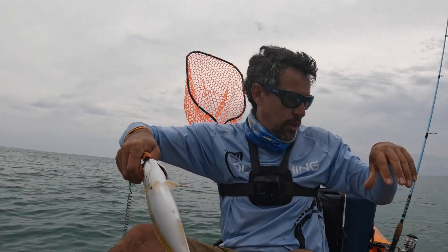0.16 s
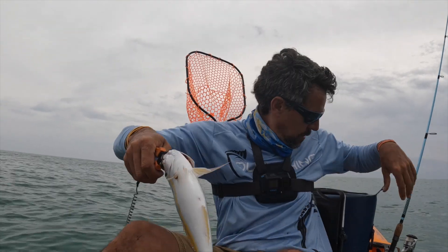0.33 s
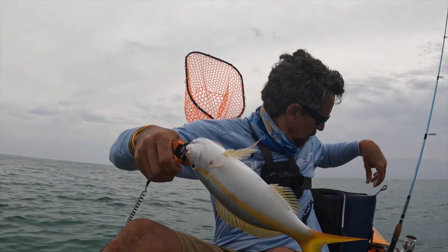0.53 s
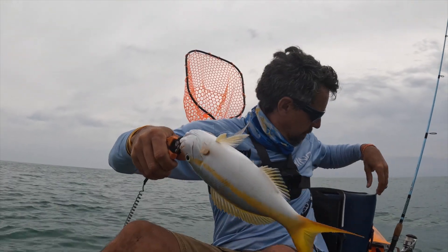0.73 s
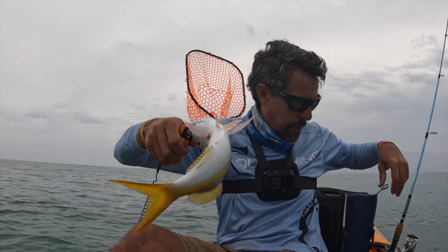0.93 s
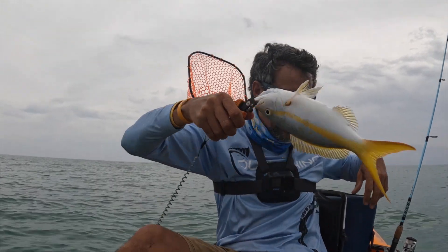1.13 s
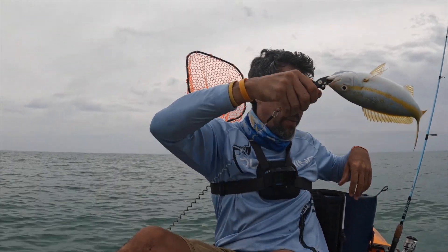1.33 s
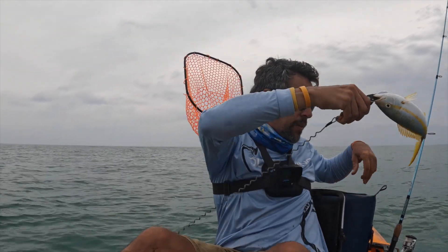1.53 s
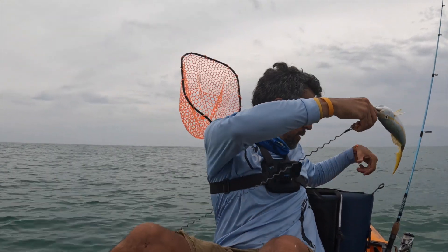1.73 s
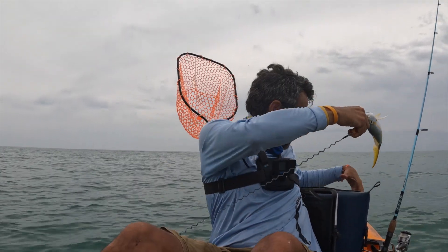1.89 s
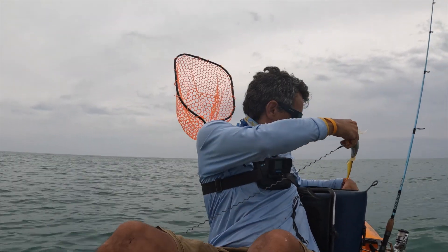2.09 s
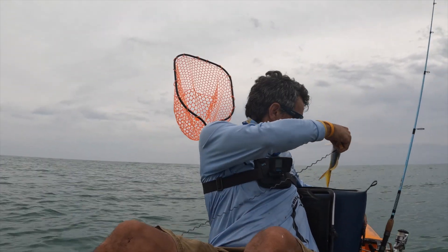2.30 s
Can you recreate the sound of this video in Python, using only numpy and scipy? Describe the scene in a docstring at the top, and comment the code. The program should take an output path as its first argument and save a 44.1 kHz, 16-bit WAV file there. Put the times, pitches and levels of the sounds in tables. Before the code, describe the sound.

Fishing gear clicks, clacks and knocks on a small boat over low wind rumble

```python
"""Kayak angler handling tackle

An angler on a kayak swings a fish on a lip gripper round to a cool bag. Tackle ticks, gear clacks and
the deck takes a sharp knock: struck decaying modes. Rubbing gear is filtered slips plus wavering squeaks.
Scuffs and rustle are shaped noise and grains; low hull thumps and drips are decaying tones.
Below lie noise for wind, steady air and a soft swish, and the wandering harmonics of a faint far engine."""
import sys
import numpy as np
from scipy import signal
from scipy.fft import rfft, irfft
from scipy.io import wavfile
from scipy.ndimage import uniform_filter1d

SR = 44100
rng = np.random.default_rng(int(sys.argv[2]) if len(sys.argv) > 2 else 0)


def persist_wave(psi):
    """Save psi, clipped to +-1, as 16-bit WAV."""
    counts = np.round(np.clip(psi, -1, 1) * 32767).astype(np.int16)
    wavfile.write(sys.argv[1], SR, np.atleast_2d(counts).T)


N = 103635  # samples, 2.35 s


def undb(db):
    """Turn decibels into an amplitude gain."""
    return 10 ** (np.asarray(db) / 20)


def unit(x):
    """Scale to rms 1."""
    return x / np.sqrt(np.mean(x ** 2))


def curve(rows):
    """Draw a gain over time, straight in dB between (time_s, level_db) points."""
    times_s, levels_db = np.array(rows).T
    return undb(np.interp(np.arange(N) / SR, times_s, levels_db))


def pan(db):
    """Give left and right gains that lie db apart; positive is left."""
    return undb(np.array([[db], [-db]]) / 2)


def noise(size, width):
    """Make stereo white noise; width is the side-to-mid amplitude ratio."""
    mid, side = rng.standard_normal((2, size))
    return (mid + width * side * np.array([[1], [-1]])) / np.hypot(1, width)


def colour(x, points):
    """Shape the spectrum by (frequency_hz, level_db) points on a log frequency axis, then set rms 1."""
    hz, db = np.array(points).T
    f = np.maximum(np.fft.rfftfreq(N, 1 / SR), 1)
    gain = undb(np.interp(np.log(f), np.log(hz), db))
    return unit(irfft(rfft(x) * gain, N))


def add(out, at, x):
    """Mix a sound in at a time in seconds, cut at the end of the scene."""
    i = int(np.clip(at * SR, 0, N - 1))
    out[:, i:i + x.shape[-1]] += x[..., :N - i]


def fade(t, t60):
    """Decay exponentially by 60 dB in t60 seconds."""
    return np.exp(-np.log(1000) * t / t60)


CONTACT_WIDTH = 0.45  # side-to-mid ratio of the chatter and blur
BLUR_SPAN = 0.14  # reach of the blur each side of a mode, as a share of its frequency
CONTACT_S = 0.00081  # linear onset


def strike(modes, rattle_s, share, blur):
    """Ring each mode with a click and a short noisy chatter, and blur it with a band of noise around it."""
    t = np.arange(SR // 8) / SR
    chatter = np.exp(-(t / rattle_s) ** 2)
    push = noise(len(t), CONTACT_WIDTH) * chatter
    push *= share / np.sqrt(np.sum(push ** 2) / 2)
    push[:, 0] += 1  # the click
    out = 0
    for k, (hz, t60, db) in enumerate(modes):
        mode = np.sin(2 * np.pi * hz * t) * fade(t, t60)
        ring = signal.fftconvolve(push, mode[None])[:, :len(t)]
        ring = (-1) ** k * ring / np.abs(ring).max()
        edges = np.clip([hz / (1 + BLUR_SPAN), hz * (1 + BLUR_SPAN)], 20, .45 * SR)
        b, a = signal.butter(2, edges, "band", fs=SR)
        near = unit(signal.lfilter(b, a, noise(len(t), CONTACT_WIDTH)))
        near = near * np.maximum(chatter, fade(t, t60))
        out = out + undb(db) * (ring + blur * near)
    return out * np.minimum(t / CONTACT_S, 1)


def balance(modes, ranges_hz, range_db):
    """Tilt the modes of one hit by its levels in a few frequency ranges."""
    return [(hz, t60, db + np.interp(np.log(hz), np.log(ranges_hz), range_db)) for hz, t60, db in modes]


# light metal ticks: start_s, left_minus_right_db, middle_db, high_db, top_db
METAL_TICKS = [(.009,2,-52,-51,-67.5),(.0305,2,-43,-51.5,-41),(.047,1,-40,-45,-36),(0.1222,4,-41,-46,-37.5),(.129,-1,-39,-42,-35),(0.1526,-3,-48,-40,-55),(0.692,-3,-49,-34.5,-89),(0.697,-3,-52,-34,-75),(0.71,-3,-61,-35,-76),(.731,2,-39,-53,-75),(.888,2,-49,-59,-82),(0.923,5,-55,-56.5,-79),(1.026,13,-36,-62,-66),(1.057,11,-50,-54,-61),(1.1174,0,-35.5,-47.5,-58),(1.317,-1,-80,-55.5,-61),(1.421,-2,-48,-45,-83),(1.481,-4,-43,-64,-51),(1.506,5,-53,-61,-62),(1.831,-3,-45,-31,-73),(1.853,0,-30,-51,-68),(1.97,3,-39,-50,-62),(1.977,1,-39,-45,-64),(2.01,8,-53,-49,-40),(2.1506,-3,-42,-53.5,-60),(2.2482,-3,-41,-61,-89),(2.284,-2.5,-48,-37.5,-74),(2.299,-3,-61,-48,-67),(2.312,-3,-55,-60,-81)]
# centres of the tick ranges: frequency_hz
TICK_CENTRES_HZ = [2610,6480,11100]
# metal modes of the tackle: pitch_hz, t60_s, relative_db
TACKLE_MODES = [(1657,0.011,-10.5),(3936,0.008,-10),(6120,0.0051,-9.5),(6890,0.024,-4.5),(7460,0.0095,0),(8570,0.0065,-12),(12020,0.014,-8)]


def tackle_ticks():
    """Small metal parts ring high and very briefly, each tick with its own tone balance."""
    out = np.zeros((2, N))
    for start_s, pan_db, *range_db in METAL_TICKS:
        modes = balance(TACKLE_MODES, TICK_CENTRES_HZ, range_db)
        add(out, start_s, pan(pan_db) * strike(modes, rattle_s=.0045, share=0.86, blur=0.25))
    return out


# hard plastic clacks: start_s, left_minus_right_db, low_db, middle_db, high_db, top_db
GEAR_CLACKS = [(0.2299,-1,-32.5,-43,-38,-48.5),(0.9012,-2,-35,-30.5,-39.5,-49),(1.028,-17,-44,-42,-50,-77),(1.435,-2,-46,-42,-48.5,-62),(1.4835,0,-65,-48,-71,-50.5),(1.505,-2,-62,-40,-71,-54.5),(1.605,5,-41.5,-49,-46.5,-61),(1.6582,1.5,-33,-29.5,-37.5,-45.5),(1.742,3,-40,-38,-37.5,-27.5),(1.772,12,-58,-49,-54,-63),(1.857,-7,-42,-36.5,-47,-55.5),(1.87,2,-47,-96,-40,-52.5),(2.007,-2,-49,-52,-25,-49),(2.346,-6,-40,-39.5,-52,-69)]
# centres of the clack ranges: frequency_hz
CLACK_CENTRES_HZ = [1000,1760,3050,7150]
# modes of the plastic gear: pitch_hz, t60_s, relative_db
GEAR_MODES = [(500,0.015,-6),(810,0.012,-6),(991,0.065,-5.5),(1184,0.035,-11),(1863,0.0088,-1),(2214,0.047,-6.5),(2728,.022,-1.5),(3140,0.017,-4),(3723,0.022,-5),(4400,0.0087,-9),(6634,0.021,-7.5),(7770,0.013,-3.5),(11270,0.016,-15),(12500,0.012,-25)]


def gear_clacks():
    """Hard plastic gear rings lower and fuller than the tackle, each clack with its own tone balance."""
    out = np.zeros((2, N))
    for start_s, pan_db, *range_db in GEAR_CLACKS:
        modes = balance(GEAR_MODES, CLACK_CENTRES_HZ, range_db)
        add(out, start_s, pan(pan_db) * strike(modes, rattle_s=0.0042, share=1, blur=0.39))
    return out


# contacts of the sharp knock: start_s, level_db
KNOCK_CONTACTS = [(2.0337,-21),(2.0352,-24),(2.04,-40.5)]
# modes of the deck: pitch_hz, t60_s, relative_db
DECK_MODES = [(260,0.14,-4.5),(382,0.046,-2.5),(497,0.052,-3),(556,0.037,-2),(784,0.13,-15),(892,0.058,-1.5),(1007,0.056,1.5),(1217,0.018,-6),(1536,0.044,-15),(1770,0.037,-3.5),(2500,0.0083,-12.5),(3710,0.0076,-12.5),(6260,0.011,-21.5),(7540,0.0084,-17.5)]


def deck_knock():
    """Contacts in quick succession ring the modes of the deck as one sharp knock."""
    out = np.zeros((2, N))
    for start_s, level_db in KNOCK_CONTACTS:
        add(out, start_s, undb(level_db) * strike(DECK_MODES, rattle_s=0.0037, share=0.51, blur=0.5))
    return out


# rubbing as the body twists: time_s, level_db
RUB_LEVEL = [(.804,-105),(.814,-65.5),(.9,-58),(.955,-75),(.98,-58.5),(1.02,-52),(1.04,-48),(1.07,-51.5),(1.1,-87),(1.35,-100),(1.4,-59.5),(1.47,-59),(1.5,-46),(1.58,-58),(1.68,-47),(1.76,-74),(1.81,-83),(1.88,-80)]
# resonances that the rubbing excites: pitch_hz, nominal_width_hz, relative_db
RUB_RESONANCES = [(1015,240,-3),(1320,100,-21),(1630,150,-4.5),(2187,180,3),(2840,230,-10),(3700,400,-24)]
SLIPS_PER_S, SLIP_SCATTER_DB = 7000, 3.5  # mean rate; dB per unit of an exponential draw


def rubbing():
    """Dense random slips ring the resonances of the gear."""
    hits = rng.random(N) < SLIPS_PER_S / SR
    strength = undb(SLIP_SCATTER_DB * np.minimum(rng.exponential(size=N), 3))
    slips = hits * strength * noise(N, width=.45)
    out = 0
    for hz, width_hz, db in RUB_RESONANCES:
        b, a = signal.iirpeak(hz, hz / (1.42 * width_hz), fs=SR)  # applied twice, which narrows it
        ring = signal.lfilter(b, a, signal.lfilter(b, a, slips))
        out = out + undb(db) * unit(ring)
    return unit(out) * curve(RUB_LEVEL) * pan(db=0.5)


# squeaks of rubbing gear: start_s, length_s, peak_level_db, mean_pitch_hz
GEAR_SQUEAKS = [(0.967,0.014,-57.5,2710),(1.009,0.017,-47,2160),(1.033,0.019,-39.5,2184),(1.053,0.011,-41,2750),(1.062,0.016,-46.5,2750),(1.071,0.013,-46,1855),(1.403,0.021,-54.5,2760),(0.448,0.034,-54.5,2230)]


def squeaks():
    """Rubbing gear gives brief tones that swell and fade on a wavering pitch."""
    out = np.zeros((2, N))
    for start_s, length_s, level_db, hz in GEAR_SQUEAKS:
        n = int(length_s * SR)
        waver = unit(uniform_filter1d(rng.standard_normal(n), size=30))
        pitch_hz = hz * (1 + 0.015 * waver)
        tone = np.sin(2 * np.pi * np.cumsum(pitch_hz) / SR)
        add(out, start_s, undb(level_db) * np.hanning(n) * tone)
    return out


# dull scuffing against seat and hull: time_s, level_db
SCUFF_LEVEL = [(.78,-60),(.88,-51),(.96,-49),(1.02,-44.5),(1.04,-34),(1.075,-40.5),(1.11,-71.5),(1.4,-59.5),(1.51,-47),(1.58,-46.5),(1.69,-46),(1.8,-52),(1.89,-54),(1.99,-45),(2.07,-43),(2.15,-60.5),(2.22,-67),(2.35,-52)]
# tone of the scuffing: frequency_hz, relative_db
SCUFF_TONE = [(110,-15),(190,4.5),(270,-0.5),(400,-3),(600,-11.5),(760,-15),(1000,-13.5),(1600,-25),(4000,-43),(9000,-80),(14000,-81)]


def scuffing():
    """Weight slides against seat and hull: wide, dull noise that swells and sinks."""
    return colour(noise(N, width=0.78), SCUFF_TONE) * curve(SCUFF_LEVEL) * pan(db=-4)


# fine rustle of sleeve and cord: time_s, level_db
RUSTLE_LEVEL = [(0,-89),(.15,-62.5),(.22,-74),(.6,-87),(.7,-78),(.8,-85),(.96,-77),(1.06,-60.5),(1.12,-74.5),(1.25,-83.5),(1.33,-76.5),(1.38,-76),(1.43,-69),(1.6,-65),(1.69,-60),(1.77,-60.5),(1.9,-69),(2.07,-64.5),(2.2,-81),(2.33,-64)]
# tone of the rustle: frequency_hz, relative_db
RUSTLE_TONE = [(500,-8),(1500,16),(3700,8),(5200,-0.5),(7200,9),(8200,0),(10000,-27.5),(12200,-14.5),(14000,-42)]
GRAINS_PER_S = 4900  # mean rate


def rustling():
    """Cloth and coiled cord give off dense tiny clicks."""
    hits = rng.random(N) < GRAINS_PER_S / SR
    grains = hits * noise(N, width=0.36)
    return colour(grains, RUSTLE_TONE) * curve(RUSTLE_LEVEL)


# low hull thumps, with a few faint ones added for unevenness:
# start_s, level_db (before the partials' own), base_pitch_hz, left_minus_right_db
HULL_THUMPS = [(.241,-28,165,-3.5),(0.516,-27.5,188,-4.5),(.978,-30.5,200,-4),(1.028,-18.5,120.2,2.5),(1.046,-19.5,78.6,8),(1.064,-17,153,-2),(1.085,-29.5,80.3,21.5),(1.444,-30.5,182,-6.5),(1.5,-25,140,-2),(1.519,-31.5,250,-0.5),(1.556,-32.5,180,0),(1.612,-21.5,87,4.5),(1.674,-21.5,87,5.5),(1.698,-30.5,179.5,-7.5),(1.876,-22,184.7,-2.5),(1.918,-26,179,-0.5),(2.035,-27,142,3),(2.059,-24,92.6,7.5)]
# partials of a thump: frequency_ratio, relative_db
HULL_PARTIALS = [(1.001,4),(1.551,-8),(2.4,-18)]
THUMP_ATTACK_S, THUMP_T60_S = 0.0043, 0.12  # t60 at ratio 1; higher partials die sooner
THUMP_PHASE_RAD = 1.39  # how far left leads right


def hull_thumps():
    """Low thumps are a few decaying partials, with left and right out of step; a few faint ones add unevenness."""
    out, t = np.zeros((2, N)), np.arange(SR // 4) / SR
    lead = np.array([[1], [-1]]) * THUMP_PHASE_RAD / 2
    onset = np.minimum(t / THUMP_ATTACK_S, 1)
    for start_s, level_db, hz, pan_db in HULL_THUMPS:
        ring = 0
        for ratio, db in HULL_PARTIALS:
            tone = np.sin(2 * np.pi * hz * ratio * t + lead)
            ring = ring + undb(db) * tone * fade(t, THUMP_T60_S / np.sqrt(ratio))
        add(out, start_s, pan(pan_db) * undb(level_db) * ring * onset)
    return out


# drips and plops beside the hull: start_s, level_db, starting_pitch_hz
WATER_DRIPS = [(.065,-53.5,1770),(0.747,-42,648),(1.93,-44,636),(1.985,-41.5,1080),(2.025,-44,1350),(2.157,-51,607)]
DRIP_T60_S, DRIP_RISE_PER_S = 0.06, 1.7  # rise as a share of the starting pitch


def drips():
    """Bubbles ring as decaying tones that rise in pitch."""
    out, t = np.zeros((2, N)), np.arange(SR // 10) / SR
    for start_s, level_db, hz in WATER_DRIPS:
        cycles = hz * t * (1 + DRIP_RISE_PER_S * t / 2)
        add(out, start_s, undb(level_db) * np.sin(2 * np.pi * cycles) * fade(t, DRIP_T60_S))
    return out


# soft swish: time_s, level_db
SWISH_LEVEL = [(0,-55),(.1,-111),(.2,-60.5),(.33,-60),(.42,-58),(.47,-53),(.54,-57.5),(.63,-64.5),(.73,-62.5),(.8,-73.5)]
# tone of the swish: frequency_hz, relative_db
SWISH_TONE = [(300,8),(700,-8),(1100,-0.5),(2400,-3.5),(3800,-6),(5300,-21.5),(7500,-7),(10000,-31),(12200,-18.5),(14000,-63)]


def soft_swish():
    """Water swishing by: coloured noise that rises and falls."""
    return colour(noise(N, width=0.3), SWISH_TONE) * curve(SWISH_LEVEL) * pan(db=-0.5)


# wind rumble: time_s, level_db
RUMBLE_LEVEL = [(0,-68),(.15,-44),(.35,-50),(.48,-36.5),(.62,-43),(.8,-39.5),(1.05,-36),(1.25,-44),(1.4,-42.5),(1.62,-34.5),(1.8,-40.5),(1.95,-38.5),(2.15,-50.5),(2.35,-47)]
# tone of the rumble: frequency_hz, relative_db
RUMBLE_TONE = [(15,-30),(30,-0.5),(60,-2.5),(100,-1.5),(170,-6.5),(250,-14),(400,-31),(800,-89),(5000,-100)]
# deepest wind buffeting: time_s, level_db
BUFFET_LEVEL = [(0,-47.5),(.35,-47.5),(.48,-35),(.6,-47),(.8,-47),(1.0,-57),(1.2,-53.5),(1.5,-50.5),(1.75,-45),(1.95,-42),(2.15,-51),(2.35,-52)]
# tone of the buffeting: frequency_hz, relative_db
BUFFET_TONE = [(10,9),(22,11),(35,3),(55,14),(90,1),(200,-43.5),(2000,-110)]


def wind():
    """Wind makes low noise in gusts, with a deeper and wider layer of buffeting."""
    rumble = colour(noise(N, width=0.33), RUMBLE_TONE) * curve(RUMBLE_LEVEL) * pan(db=-.3)
    buffet = colour(noise(N, width=0.7), BUFFET_TONE) * curve(BUFFET_LEVEL)
    return rumble + buffet


# tone of the steady air noise: frequency_hz, relative_db
AIR_TONE = [(100,8.5),(200,7),(270,-1),(360,-16.5),(600,-26.5),(1000,-28),(2000,-40.5),(3800,-62),(5300,-66),(7500,-39.5),(10000,-57.5),(12200,-48),(14000,-65)]


def air_bed():
    """Steady air noise: a faint, mostly low background bed."""
    return colour(noise(N, width=0.11), AIR_TONE) * undb(-45) * pan(db=2)


# engine harmonics from the first up: rms_level_db
ENGINE_HARMONICS_DB = [-50.5,-49,-53.5,-76]
ENGINE_HZ, ENGINE_WANDER = 76.98, 0.0045  # centre pitch; rms drift as a share of it


def engine():
    """A far engine hums in harmonics that share one slowly wandering pitch."""
    wander = colour(rng.standard_normal(N), [(2, 0), (20, -60), (200, -120)])
    phase = 2 * np.pi * np.cumsum(ENGINE_HZ * (1 + ENGINE_WANDER * wander)) / SR
    hum = 0
    for number, db in enumerate(ENGINE_HARMONICS_DB, start=1):
        start_phase = 2 * np.pi * rng.random()
        hum = hum + undb(db) * np.sqrt(2) * np.sin(number * phase + start_phase)
    return pan(db=-2.5) * hum


def scene():
    """Mix everything heard from the deck."""
    handling = tackle_ticks() + gear_clacks() + deck_knock()
    friction = rubbing() + squeaks() + scuffing() + rustling()
    boat_and_water = hull_thumps() + drips() + soft_swish()
    background = wind() + air_bed() + engine()
    return handling + friction + boat_and_water + background


def record(dry):
    """Cut the top steeply above 13.5 kHz with an elliptic low-pass."""
    low_pass = signal.ellip(8, .2, 70, 13500, fs=SR, output="sos")  # 0.2 dB ripple, 70 dB rejection
    return signal.sosfilt(low_pass, dry)


dry = scene()
out = record(dry)
persist_wave(out)
```